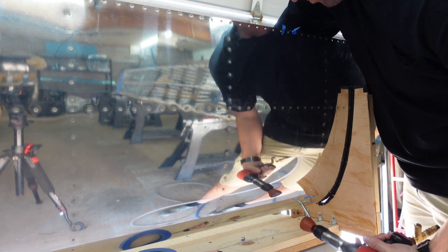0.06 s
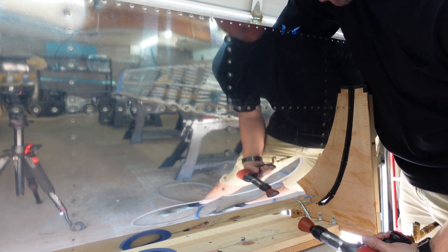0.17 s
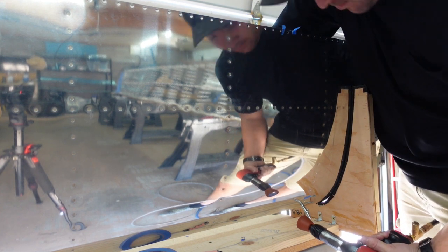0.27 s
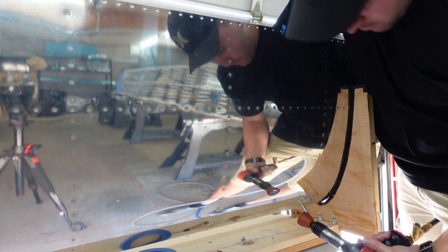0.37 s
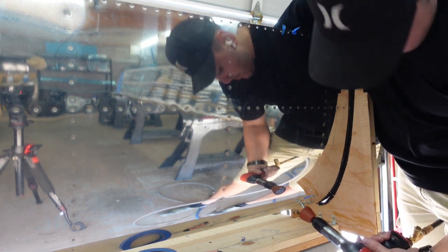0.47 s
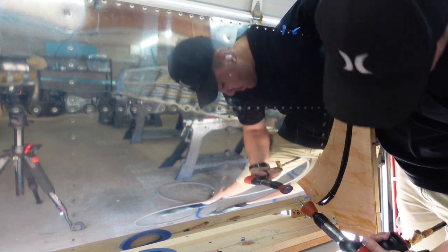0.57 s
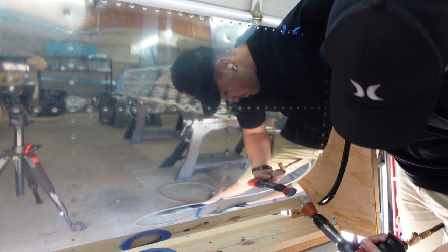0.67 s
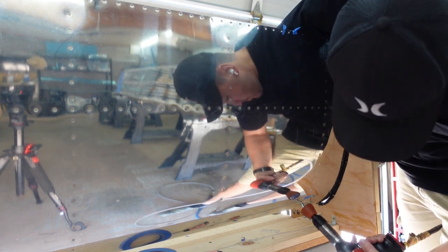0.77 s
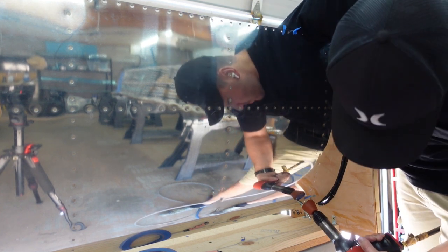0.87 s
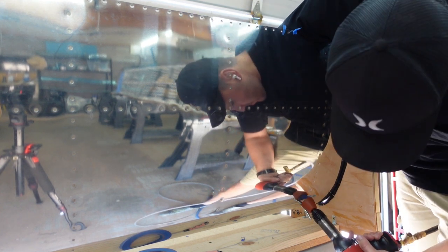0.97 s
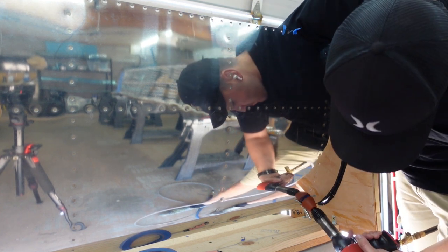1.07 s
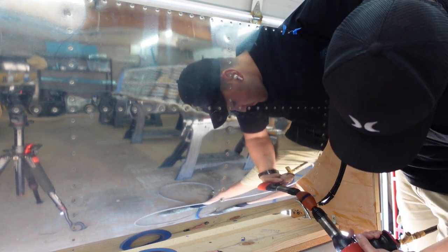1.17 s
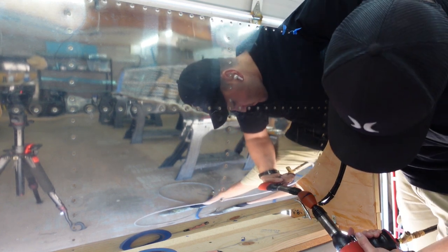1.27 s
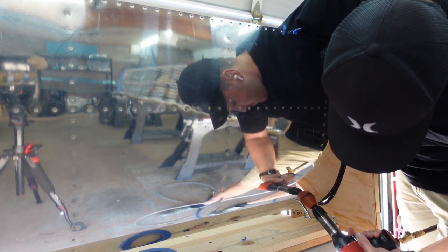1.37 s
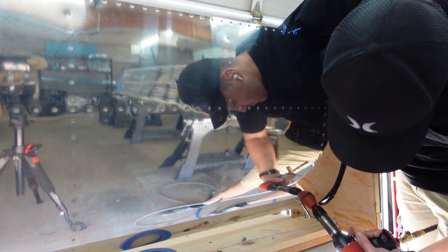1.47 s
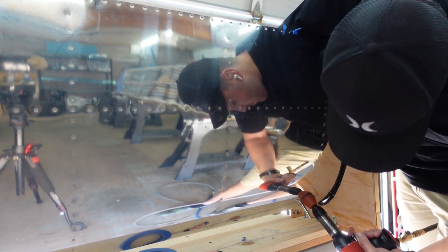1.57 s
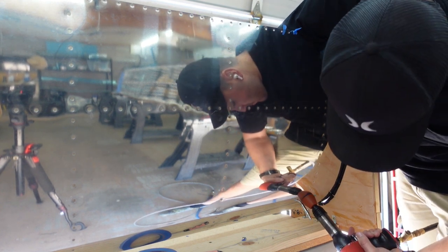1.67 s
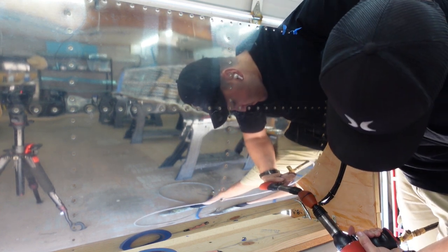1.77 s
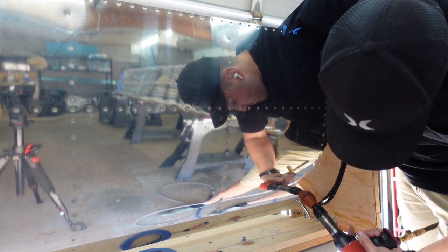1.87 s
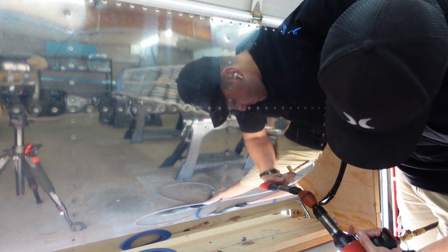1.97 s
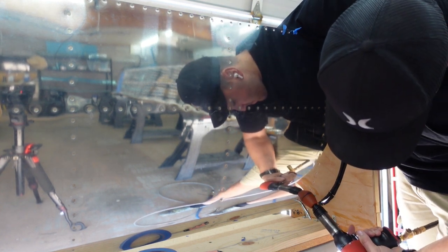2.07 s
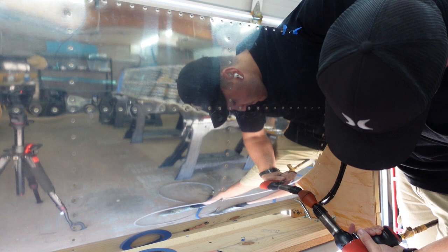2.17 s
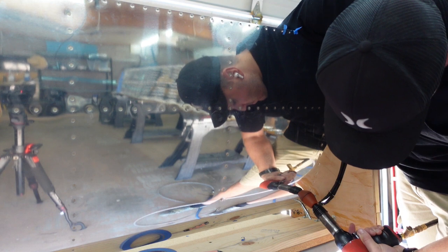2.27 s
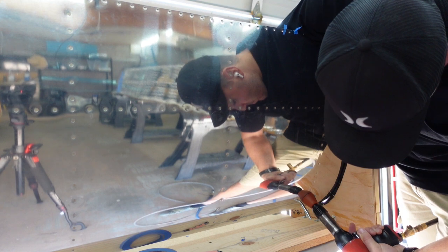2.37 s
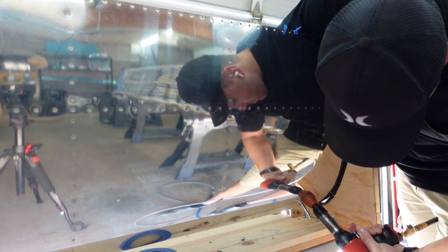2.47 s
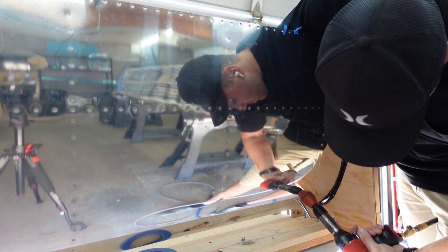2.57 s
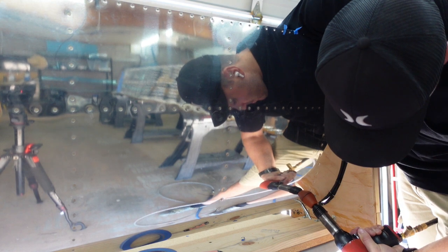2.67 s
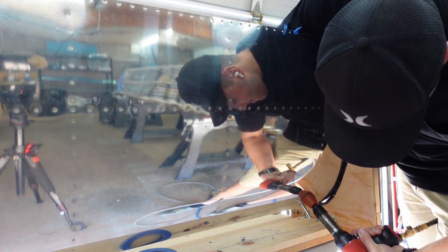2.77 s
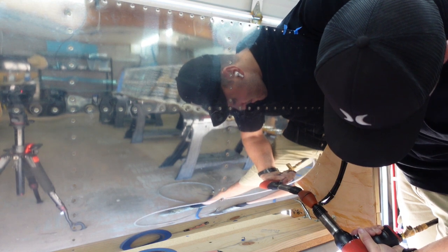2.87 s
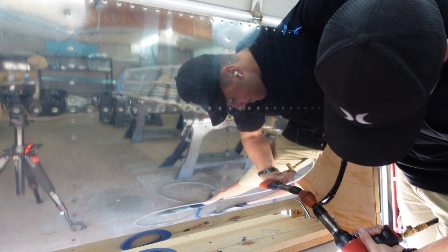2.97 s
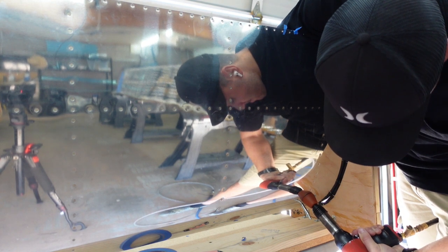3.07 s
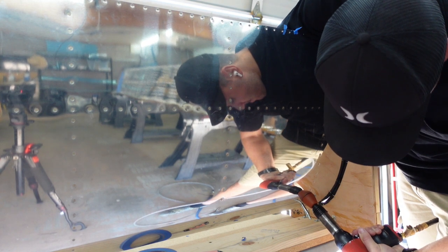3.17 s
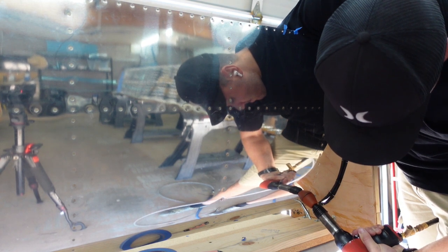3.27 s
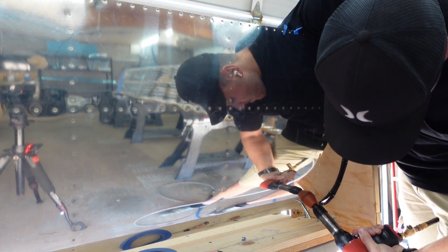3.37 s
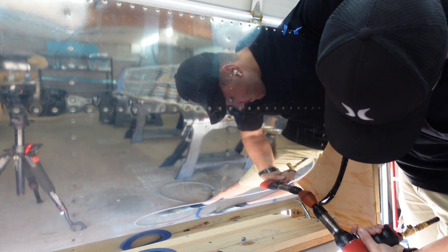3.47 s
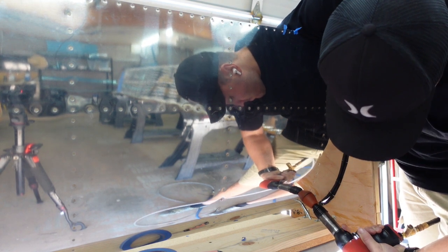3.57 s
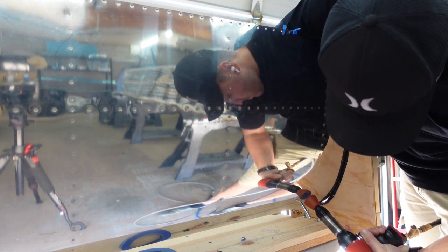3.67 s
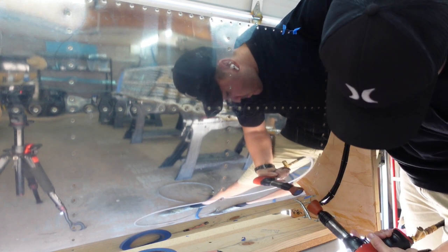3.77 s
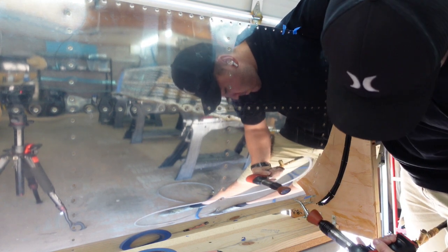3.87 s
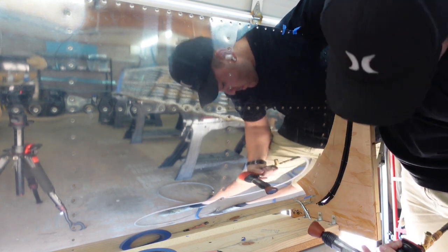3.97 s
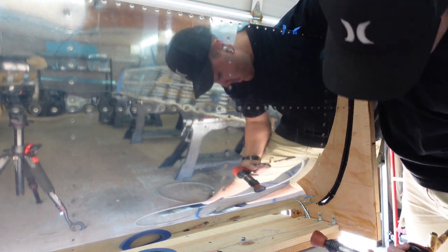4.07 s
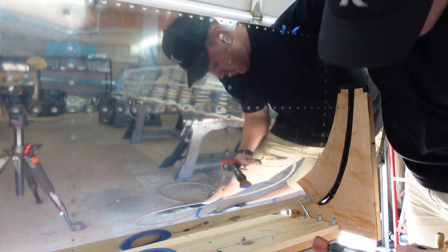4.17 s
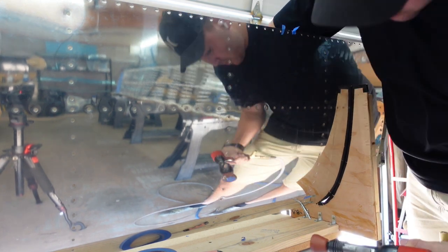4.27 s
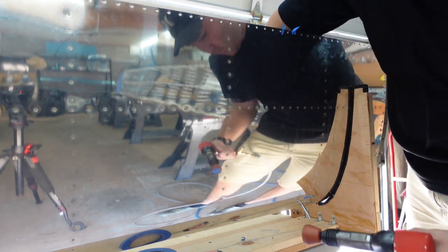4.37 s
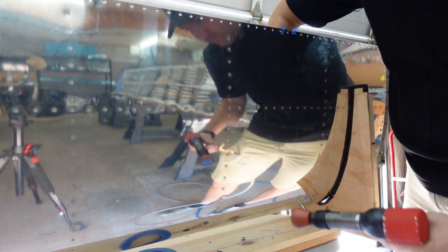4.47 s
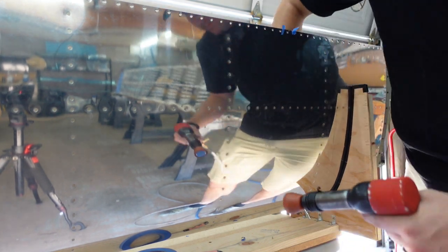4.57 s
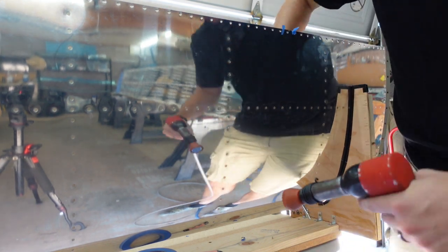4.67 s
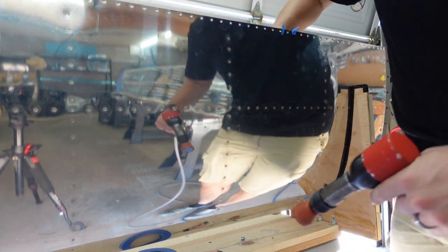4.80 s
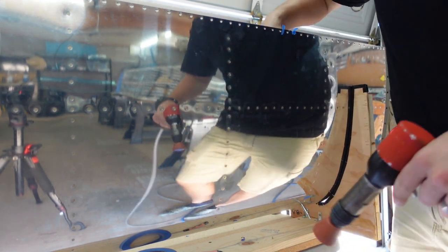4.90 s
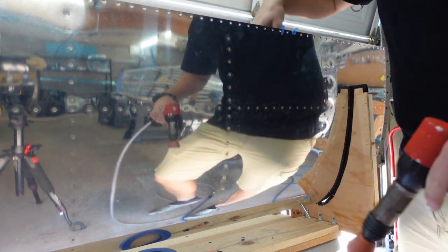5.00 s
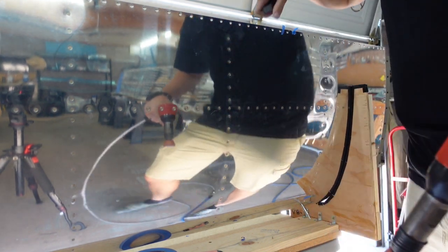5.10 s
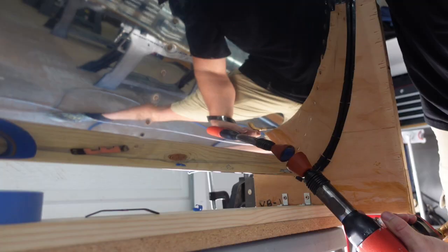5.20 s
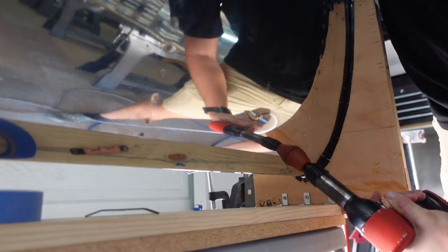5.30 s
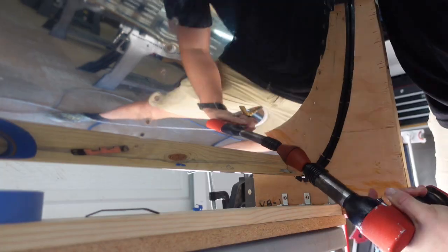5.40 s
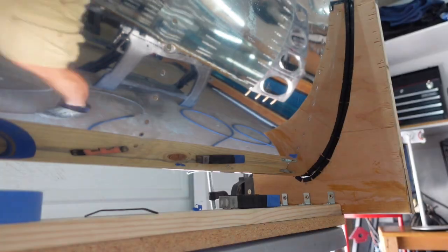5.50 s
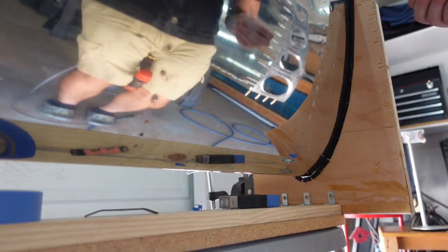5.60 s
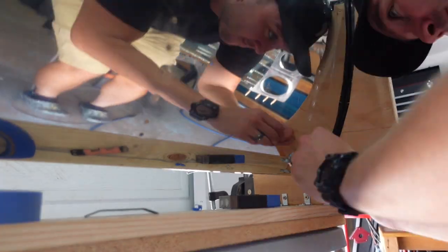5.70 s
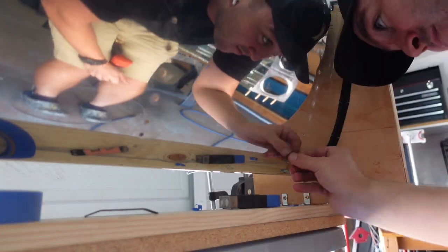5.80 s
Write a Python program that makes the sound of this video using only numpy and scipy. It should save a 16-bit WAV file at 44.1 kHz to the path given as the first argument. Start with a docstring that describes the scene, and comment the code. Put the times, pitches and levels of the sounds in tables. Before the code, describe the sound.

A large workshop fan rushes steadily, slightly left, with a faint brush of cloth. Just before three seconds, steel clicks, soft nudges and a light tap come close by, then a pneumatic rivet gun fires one fast, loud burst on sheet aluminium. It loses air in slowing, dull thumps. The fan, ducked by the burst, creeps back; more cloth rustles and a tiny click follow before an abrupt stop. Close microphone, narrow stereo, live reverberant shop.

```python
"""A big workshop fan is heard first: turbulent noise in two bands with wavering tones; cloth brushes past.
Steel clicks, soft nudges and one light tap follow, then a pneumatic rivet gun sets a rivet in an aluminium skin.
Its piston stutters, hammers about 25 times a second against the bucking bar, then runs out of air in dull strokes.
Every blow is a crack plus the decaying wash of sheet and room, with metal ringing and low lines in the buzz.
A gain control ducks the fan under the burst and lets it creep back."""
import sys
import numpy as np
from scipy import signal
from scipy.fft import rfft, irfft, next_fast_len
from scipy.io import wavfile
from scipy.ndimage import uniform_filter1d

SR = 44100
rng = np.random.default_rng(int(sys.argv[2]) if len(sys.argv) > 2 else 0)


def int16_out(signal):
    """Quantize to a 16-bit WAV file."""
    q = np.round(np.clip(np.atleast_2d(signal).T, -1, 1) * 32767)
    wavfile.write(sys.argv[1], SR, q.astype(np.int16))


N = 257764
TIME = np.arange(N) / SR
AGE = np.arange(SR) / SR   # time since a hit [s]


def amp(db):
    """Logarithmic level: decibels to amplitude gain."""
    return 10 ** (np.asarray(db) / 20)


def rms_one(x):
    """Power normalisation: scale to rms 1."""
    return x / np.sqrt(np.mean(x ** 2) + 1e-20)


def energy_one(x):
    """Energy normalisation: scale to a mean energy of 1 per channel."""
    return rms_one(x) / np.sqrt(x.shape[-1])


def at_hz(points, hz):
    """Logarithmic pitch scale: interpolate a table over log frequency."""
    f, value = np.transpose(points)
    return np.interp(np.log(np.maximum(hz, 1)), np.log(f), value)


def coloured(x, spectrum):
    """Linear filtering: multiply the spectrum by a smooth gain curve."""
    length = x.shape[-1]
    size = next_fast_len(length + 4096)
    hz = np.arange(size // 2 + 1) * SR / size
    gain = amp(at_hz(spectrum, hz))
    return irfft(rfft(x, size) * gain, size)[..., :length]


def drift(rate):
    """Low-passed random process: slow chance with spread 1, rate [Hz] setting its bandwidth."""
    step = 40   # samples between slow values
    r = np.exp(-2 * np.pi * rate * step / SR)
    white = rng.standard_normal(N // step + 2002)
    slow = signal.lfilter([1], [1, -2 * r, r * r], white)[2000:]   # without the filter's start
    return np.interp(np.arange(N) / step, np.arange(len(slow)), rms_one(slow))


def resonance(x, hz, width):
    """Damped resonator: a two-pole band-pass with gain 1 at its peak; width is the bandwidth [Hz]."""
    r = np.exp(-np.pi * width / SR)
    zeros = np.array([1, 0, -1]) * (1 - r * r) / 2
    poles = [1, -2 * r * np.cos(2 * np.pi * hz / SR), r * r]
    return signal.lfilter(zeros, poles, x + 1e-18)   # the tiny offset avoids denormal numbers


def add(out, s, sound):
    """Superposition: mix a sound in at time s [s]."""
    at = round(s * SR)
    out[..., at:at + sound.shape[-1]] += sound[..., :N - at]


# Difference between two close microphone ports for the near gun: (frequency [Hz], side minus mid [dB])
GUN_WIDTH = [(60, -22.5), (110, -14.5), (200, -31), (400, -24.5), (700, -20), (2400, -29), (4400, -18),
             (15000, -18.5)]


def stereo_noise(size, width=GUN_WIDTH):
    """Partial coherence: two close ports hear nearly the same white noise."""
    mid, side = rng.standard_normal((2, size))
    return mid + coloured(side, width) * [[1], [-1]]


# Spectra of the fan's rushing air, low and high part: (frequency [Hz], relative density [dB per Hz])
FAN_LOW = [(30, -57.5), (45, -35), (58, -10), (76, -15), (100, -7.5), (170, -1), (230, -1.5), (300, 0.5),
           (350, 0.5), (420, -2), (520, -5), (600, -13.5), (780, -26.5), (1300, -90.5)]
FAN_HIGH = [(350, -37), (600, -3.5), (708, -2), (768, -3), (823, -2.5), (957, -4.5), (1040, -4), (1470, -9),
            (1640, -8.5), (2400, -11.5), (3530, -16), (9760, -26.5), (15100, -33.5), (16000, -26)]
# Fan tones: (frequency [Hz], relative rms level [dB])
FAN_TONES = [(172.3, -42), (367.3, -33), (689.1, -43)]
# Difference between the ports for the far fan's noise: (frequency [Hz], side minus mid [dB])
FAN_WIDTH = [(60, -23.5), (170, -28.5), (380, -20), (700, -14), (1300, -12.5), (4400, -10.5), (15000, -8.5)]
# The fan stands to the left: (frequency [Hz], left minus right [dB])
FAN_SIDE = [(60, 0.0), (110, 0.0), (200, 0), (380, 1.0), (700, 2.0), (1290, 2.5), (2380, 2), (4400, 4.5),
            (8120, 2), (15000, 2.5)]


def fan(flutter_db, waver_db, phase_wander):
    """Turbulent flow noise and blade tones: fluttering broadband air, sines wavering in level and phase [rad]."""
    rumble = rms_one(coloured(stereo_noise(N, FAN_WIDTH), FAN_LOW))
    rumble = rumble * amp(-27.5 + flutter_db * drift(rate=6.3))
    hiss = rms_one(coloured(stereo_noise(N, FAN_WIDTH), FAN_HIGH))
    hiss = hiss * amp(-28 + 0.14 * drift(rate=12))
    tones = np.zeros(N)
    for hz, db in FAN_TONES:
        phase = 2 * np.pi * hz * TIME + phase_wander * drift(rate=2.5)
        tones += amp(db + waver_db * drift(rate=7.8)) * np.sqrt(2) * np.sin(phase)
    left, right = rumble + hiss + tones
    # each port takes half of the level difference
    left = coloured(left, np.array(FAN_SIDE) * [1, .5])
    right = coloured(right, np.array(FAN_SIDE) * [1, -.5])
    return np.array([left, right])


# Sleeves and hose brushing past: (time [s], relative level [dB], decay time constant [s])
BRUSHES = [(0.373, -30, 0.056), (.44, -47, 0.053), (4.67, -33, 0.076), (4.758, -38.5, 0.11)]
# Spectrum of the brushing: (frequency [Hz], relative density [dB per Hz])
BRUSH_COLOUR = [(1000, -6), (3800, 9), (6500, 4), (10000, 0.5), (15500, -11.5)]


def brushes(rise_s, grain_db):
    """Friction noise: contact pressure shapes coloured noise with a grainy level into short swishes."""
    pressure = np.zeros(N)
    for s, db, length in BRUSHES:
        add(pressure, s, amp(db) * (1 - np.exp(-AGE / rise_s)) * np.exp(-AGE / length))
    cloth = rms_one(coloured(stereo_noise(size=N), BRUSH_COLOUR))
    return pressure * amp(grain_db * drift(rate=110)) * cloth


# Decay of sheet and room: (frequency [Hz], time to fall by 60 dB [s])
DECAY = [(150, .6), (600, .64), (2500, .58), (6000, .5), (10000, .38), (15000, .33)]


def wash(build_s):
    """Diffuse reverberation: dense ringing of sheet and room builds up quickly, and the treble dies first."""
    white, hz = rfft(stereo_noise(size=SR)), np.arange(SR // 2 + 1)
    edges, out = np.geomspace(40, 17000, 25), 0
    for low, high in zip(edges, edges[1:]):
        band = irfft(white * ((hz >= low) & (hz < high)), SR)
        fade = amp(-60 * AGE / at_hz(DECAY, np.sqrt(low * high)))
        build = 1 - np.exp(-AGE / build_s)
        # equal energy per Hz in every band
        out = out + energy_one(band * fade * build) * np.sqrt(high - low)
    return energy_one(out)


# Trigger and rivet set clicking: (time [s], relative level [dB], ring frequency [Hz])
CLICKS = [(2.7315, -19.5, 11800), (2.7870, -10.5, 10850), (2.8935, -9.5, 11000), (3.8460, -26, 12000),
          (5.1100, -25, 11770)]
# Filter curve of the clicks: (frequency [Hz], relative gain [dB])
CLICK_COLOUR = [(300, -6.5), (1200, 3.5), (4000, -2.5), (8000, -3.5), (13000, 0), (16000, -8.5)]


def clicks(snap_s, ring_db, ring_width, room_db):
    """Impulsive excitation: small steel parts snap together and ping high up; the wash answers."""
    out = np.zeros((2, N))
    for s, db, hz in CLICKS:
        snap = amp(db) * stereo_noise(size=SR // 10) * np.exp(-AGE[:SR // 10] / snap_s)
        add(out, s, snap + amp(ring_db) * resonance(snap, hz, ring_width))
    out = coloured(out, CLICK_COLOUR)
    room = signal.fftconvolve(out, wash(build_s=0.0025), axes=1)[:, :N]
    return out + amp(room_db) * room


# the trigger is let go [s]; the air bleeds away over this time [s]
RELEASE_S, BLEED_S = 3.425, .43
STRIKE_PRESSURE = 0.48   # share of full pressure that the piston needs to reach the rivet


def pressure_at(s):
    """Reservoir discharge: air in the gun, 0-1, is full until the release, then bleeds away linearly."""
    return np.clip(1 - (s - RELEASE_S) / BLEED_S, 0, 1)


def force_at(s):
    """Work and kinetic energy: blow strength, 0-1, goes with piston speed, the root of the spare pressure."""
    spare = (pressure_at(s) - STRIKE_PRESSURE) / (1 - STRIKE_PRESSURE)
    return np.sqrt(np.clip(spare, 1e-6, .999))


# What misses the rivet shakes the panel: first felt stroke [s], cycle [s], panel pitch [Hz]
SHUTTLE_S, SHUTTLE_CYCLE_S, SHUTTLE_HZ = 3.4915, .041, 192
# relative level if full pressure all went into the panel [dB]; time to the top of a push [s]
SHUTTLE_DB, SHUTTLE_RISE_S = 1.5, 0.011


def soft_strokes(count):
    """Energy sharing: thumps swell as the blows fail, then fade with the last air; rows as in NUDGES."""
    times = SHUTTLE_S + SHUTTLE_CYCLE_S * np.arange(count)
    missed = 1 - force_at(times) ** 2
    levels = SHUTTLE_DB + 20 * np.log10(pressure_at(times) * missed)
    return [(s, db, SHUTTLE_HZ, SHUTTLE_RISE_S) for s, db in zip(times, levels)]


# The gun nudges the panel as it starts and as it lifts off:
# (time [s], relative level [dB], pitch [Hz], rise time [s])
NUDGES = [(2.784, -18, 281, .012), (2.838, -22.5, 302, .012), (2.889, -19, 465, .011),
          (3.87, -21, 167.5, 0.083)]


def thumps(puff_db, puff_hz, puff_width, sharpness, room_db):
    """Forced vibration: a slow push swings the panel for a few cycles; exhaust puffs with it while there is air."""
    swing, exhaust = np.zeros(N), np.zeros((2, N))
    for s, db, hz, rise_s in list(NUDGES) + soft_strokes(count=9):
        push = amp(db) * (AGE / rise_s * np.exp(1 - AGE / rise_s)) ** sharpness
        add(swing, s, push * np.sin(2 * np.pi * hz * AGE))
        add(exhaust, s, push * pressure_at(s) * stereo_noise(size=SR))
    for _ in range(2):
        exhaust = resonance(exhaust, puff_hz, puff_width)
    exhaust = amp(puff_db) * exhaust
    # the panel is close and nearly dry; the exhaust points away and comes back from the room
    to_room = amp(room_db) * swing + exhaust
    return swing + signal.fftconvolve(to_room, wash(build_s=0.0055), axes=1)[:, :N]


# The direct crack keeps the treble that the room loses: (frequency [Hz], relative gain [dB])
CRACK_COLOUR = [(300, -4), (1200, 0), (2700, 1.5), (5000, -3), (10000, -2), (13000, 1.5)]


def impact(crack_db, crack_s):
    """Direct and reverberant field: the crack of steel on rivet, crack_db relative to its wash."""
    crack = energy_one(stereo_noise(size=SR) * AGE * np.exp(-AGE / crack_s))
    return amp(crack_db) * coloured(crack, CRACK_COLOUR) + wash(build_s=0.009)


TAP_S = 2.8140   # the set is still loose on the rivet
# Filter curve of the light tap: (frequency [Hz], relative gain [dB])
TAP_COLOUR = [(150, -18), (400, 3), (1500, -4.5), (2600, -2.5), (3500, 1.5), (4800, -5), (5400, -5.5),
              (9000, -11.5), (10000, -2.5), (11500, -8), (12200, -20.5), (16000, -22.5)]


def first_tap(level_db, crack_db):
    """Weak impact: one light blow before the set is seated, as a filtered crack and wash."""
    out = np.zeros((2, N))
    tap = coloured(impact(crack_db, crack_s=.00045), TAP_COLOUR)
    add(out, TAP_S, amp(level_db) * energy_one(tap))
    return out


# In the bass the bending wave of the skin outweighs the wash: (frequency [Hz], gain [dB])
BENDING = [(60, -9.5), (140, -16.5), (600, -10.5), (900, -17.5), (1500, -37.5)]


def bending_wave(delay_s):
    """Dispersion: bending waves travel with the root of frequency, smearing a kick; delay_s is for 200 Hz."""
    hz = np.arange(SR // 2 + 1)
    kick = irfft(np.exp(-4j * np.pi * delay_s * np.sqrt(200 * hz)), SR)
    return coloured(kick, BENDING)


FIRST_BLOW_S = 2.9114
# piston cycle at full pressure [s]; how it lengthens as the hose pressure sags [s per s squared]
STROKE_S, STROKE_SAG = .0398, .006
# extra cycle time with the set loose and with the air gone [s]; time for the set to seat [s]
LOOSE_LAG_S, EMPTY_LAG_S, SEAT_S = .0195, .066, .0675
# a loose blow is weaker [dB] and duller [about dB per octave]; so is a blow short of air
LOOSE_DB, LOOSE_TILT_DB, WEAK_TILT_DB = -4.5, -2, -2


def blows(count):
    """Relaxation cycle: strokes quicken as the set seats and slow without air; rows (time [s], level [dB], tilt)."""
    s, rows = FIRST_BLOW_S, []
    for _ in range(count):
        age, force = s - FIRST_BLOW_S, force_at(s)
        loose = np.exp(-(age / SEAT_S) ** 2)
        level = 20 * np.log10(force) + LOOSE_DB * loose
        tilt = LOOSE_TILT_DB * loose + WEAK_TILT_DB * (1 - force)
        rows.append((s, level, tilt))
        cycle = STROKE_S + STROKE_SAG * age ** 2
        s = s + cycle + LOOSE_LAG_S * loose + EMPTY_LAG_S * (1 - pressure_at(s))
    return rows


# Crack and wash give way to the bending wave in the bass: (frequency [Hz], gain [dB])
WASH_SHARE = [(300, -9), (550, -5), (850, 0)]
# The part of a blow that changes from one to the next: (frequency [Hz], gain [dB])
SCATTER = [(200, -17), (550, -12), (1300, -1), (3500, -5), (12000, -5)]
# Low lines strengthened in the hammering's buzz, near multiples of the blow rate:
# (frequency [Hz], bandwidth [Hz], relative gain [dB])
LOW_LINES = [(200, 30, -1), (430, 24, 6.5), (524, 20, 1), (562, 20, -3)]
# Resonances of rivet set and bar: (frequency [Hz], bandwidth [Hz], relative gain [dB])
METAL = [(2665, 70, 1), (4240, 110, 0), (5000, 150, -2), (5600, 100, -2), (7040, 49, -4), (7570, 35, -3),
         (8600, 29, -3.5), (10000, 55, 3), (10200, 61, -2), (11100, 39, 1)]
# Filter curve over all the blows: (frequency [Hz], relative gain [dB])
BLOW_COLOUR = [(50, -40), (100, -5.5), (190, 13), (600, 8), (780, 1), (1100, 1.5), (1500, -1.5),
               (2600, 0.5), (3400, -1), (4400, 0), (7000, 1.5), (8200, -1.5), (9900, 0), (12500, -7.5),
               (16000, -9)]


def hammering(level_db, crack_db, metal_db):
    """Repeated impulse response: blows share one sound, plus a part that changes as the set shifts on the rivet."""
    response = coloured(impact(crack_db, crack_s=0.00051), WASH_SHARE) + bending_wave(delay_s=.035)
    shifted = coloured(np.array([wash(build_s=0.0011) for _ in range(3)]), SCATTER)
    out = np.zeros((2, N))
    for s, db, tilt in blows(count=16):
        weights = energy_one(rng.standard_normal(len(shifted)))
        blow = response + np.tensordot(weights, shifted, axes=1)
        tilt_curve = [(600, 0), (1200, -2 * tilt), (16000, 2 * tilt)]
        add(out, s, amp(db) * coloured(blow, tilt_curve))
    low_buzz = sum(amp(db) * resonance(out, hz, width) for hz, width, db in LOW_LINES)
    ringing = sum(amp(db) * resonance(out, hz, width) for hz, width, db in METAL)
    struck = out + low_buzz + amp(metal_db) * ringing
    return amp(level_db) * rms_one(coloured(struck, BLOW_COLOUR))


def scene():
    """Superposition of sources: the fan behind, the gun close in front."""
    air = fan(flutter_db=1.0, waver_db=1.4, phase_wander=.7)
    cloth = brushes(rise_s=0.0042, grain_db=0.4)
    gun = clicks(snap_s=.0014, ring_db=7.0, ring_width=460, room_db=-3.5)
    gun = gun + thumps(puff_db=9.5, puff_hz=480, puff_width=480, sharpness=3.3, room_db=-14)
    gun = gun + first_tap(level_db=16, crack_db=-10.2)
    gun = gun + hammering(level_db=-13.0, crack_db=-5.2, metal_db=-6.5)
    return air + cloth + gun


def gain_control(x, ceiling_db, window_s, release_db_per_s):
    """Dynamic range compression: loud sound above the bass turns the gain down quickly; it creeps back afterwards."""
    high_pass = signal.butter(2, 400, "high", fs=SR, output="sos")
    sensed = signal.sosfilt(high_pass, x)
    power = uniform_filter1d(np.mean(sensed ** 2, axis=0), max(int(window_s * SR), 1))
    excess = np.maximum(10 * np.log10(np.maximum(power, 1e-12)) - ceiling_db, 0)
    # a running peak that falls at the release rate
    recovery = release_db_per_s * TIME
    held = np.maximum.accumulate(excess + recovery) - recovery
    return x * amp(-uniform_filter1d(held, size=128))


STOP_S, CUTOFF_HZ = 5.225, 15750   # the sound is cut off here; top of the passband


def record(dry):
    """Soft saturation and band limiting: gain control, rounded peaks, an abrupt stop and a steep top cut."""
    levelled = gain_control(dry, ceiling_db=-15, window_s=0.019, release_db_per_s=93.5)
    rounded = np.tanh(levelled) * (TIME < STOP_S)
    top_cut = signal.ellip(12, .1, 80, CUTOFF_HZ, fs=SR, output="sos")
    return signal.sosfilt(top_cut, rounded)


dry = scene()
out = record(dry)
int16_out(out)
```